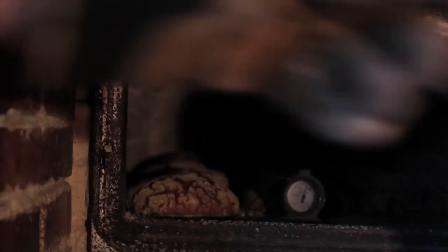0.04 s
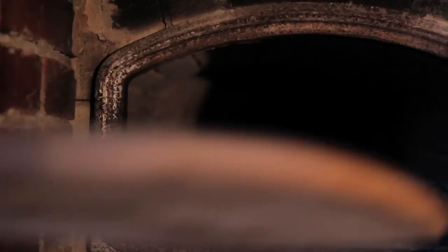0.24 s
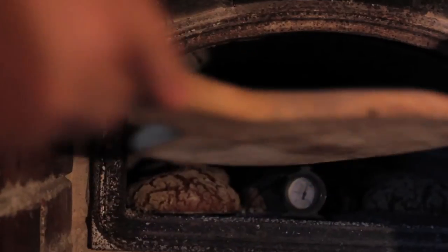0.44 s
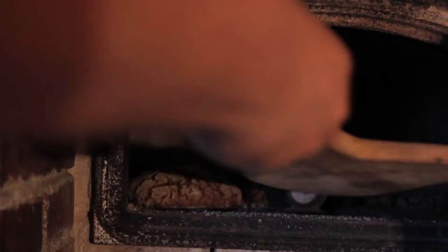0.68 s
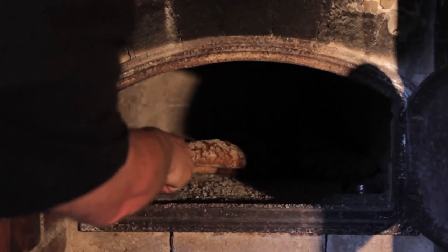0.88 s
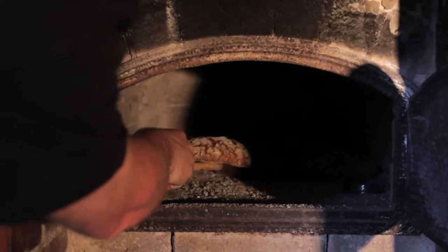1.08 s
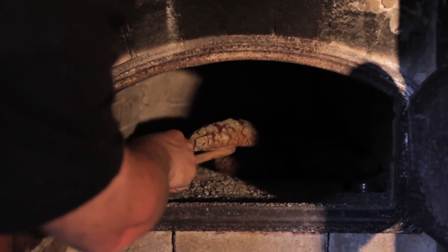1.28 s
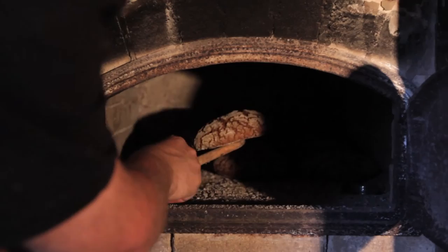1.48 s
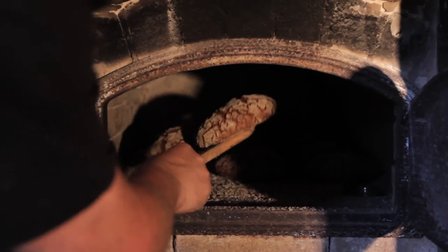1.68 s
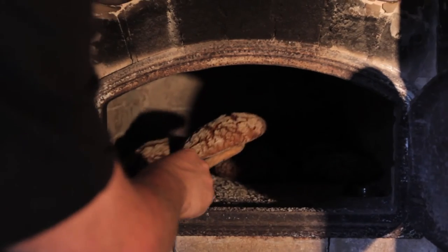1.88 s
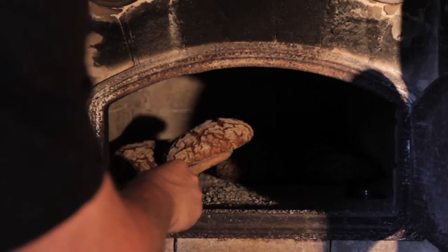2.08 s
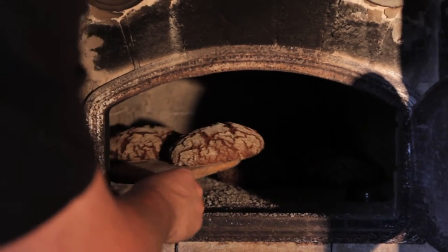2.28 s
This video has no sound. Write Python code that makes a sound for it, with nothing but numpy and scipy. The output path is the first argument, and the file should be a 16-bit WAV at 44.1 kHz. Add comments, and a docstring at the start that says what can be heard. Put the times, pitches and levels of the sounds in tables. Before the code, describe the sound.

One hard knock of a baker's wooden paddle on iron, followed by gritty sliding and clicks.

```python
"""A wooden baker's peel (a long flat shovel) works at a brick oven, close by in a small quiet room.
It starts to move with a low shudder and two thin chinks of iron, then knocks once, hard, at the
oven's iron mouth, which rings on faintly. Next the blade slides in over the gritty hearth, bumping
and clicking. Last, the shaft rubs to and fro, still shuddering."""
import sys
import numpy as np
from scipy import signal
from scipy.fft import rfft, irfft, next_fast_len
from scipy.io import wavfile

SR = 44100
rng = np.random.default_rng(int(sys.argv[2]) if len(sys.argv) > 2 else 0)


def pcm_store(signal):
    """Save signal as 16-bit PCM."""
    levels = np.round(np.clip(np.atleast_2d(signal), -1, 1) * 32767)
    wavfile.write(sys.argv[1], SR, levels.astype(np.int16).T)


N = 108045
T = np.arange(N) / SR


def amp(db):
    """Turn decibels into a gain."""
    return 10 ** (np.asarray(db) / 20)


def unit(x):
    """Scale x to an average power of 1."""
    return x / np.sqrt(np.mean(x ** 2) + 1e-20)


def along(points, hz):
    """Read between (pitch_hz, value) points on a musical pitch scale."""
    pitches, values = np.transpose(points)
    return np.interp(np.log(hz + 1), np.log(pitches + 1), values)


def level(points):
    """A gain for every sample, from (time_s, level_db) points."""
    return amp(np.interp(T, *np.transpose(points)))


def filtered(x, response):
    """Turn each pitch in x up or down by response(hz)."""
    size = next_fast_len(len(x) + 8192)
    hz = np.fft.rfftfreq(size, 1 / SR)
    return irfft(rfft(x, size) * response(hz), size)[:len(x)]


def noise(gain, size=N):
    """Steady noise whose tone is set by gain(hz)."""
    hz = np.fft.rfftfreq(size, 1 / SR)
    phases = np.exp(2j * np.pi * rng.random(len(hz)))
    return unit(irfft(gain(hz) * phases, size))


def colour(points, top_hz=np.inf):
    """A tone curve from (pitch_hz, gain_db) points, dulled above top_hz."""
    return lambda hz: amp(along(points, hz)) / np.sqrt(1 + (hz / top_hz) ** 6)


def body(peaks):
    """The tone curve of an object that favours some pitches: (pitch_hz, width_hz, gain_db)."""
    return lambda f: sum((-1) ** k * amp(db) * 1j * f * width / (hz * hz - f * f + 1j * f * width)
                         for k, (hz, width, db) in enumerate(peaks))


def rise(t, attack_s):
    """A quick swell from silence to full level."""
    return 1 - np.exp(-t / attack_s)


def fade(t, fade_s):
    """A smooth fall that is 60 dB down after fade_s."""
    return np.exp(-np.log(1000) * t / fade_s)


def dying(x, fades):
    """Let each pitch in x die at its own speed, from (pitch_hz, fade_s) points."""
    hz, t, spectrum = signal.stft(x, SR, nperseg=256)
    spectrum = spectrum * fade(t, along(fades, hz)[:, None])
    return signal.istft(spectrum, SR, nperseg=256)[1][:len(x)]


def ring(notes, t, blur=0):
    """The fading notes of a struck object, each smeared by the share blur of its pitch."""
    out = np.zeros(len(t))
    for k, (hz, db, fade_s) in enumerate(notes):
        drift = np.cumsum(rng.standard_normal(len(t))) * np.sqrt(2 * np.pi * blur * hz / SR)
        out += (-1) ** k * amp(db) * fade(t, fade_s) * np.sin(2 * np.pi * hz * t + drift)
    return out


def burst(envelope, gain):
    """A short spray of contact noise, with its tone set by gain(hz)."""
    size = 2 * len(envelope)
    curve = unit(np.abs(gain(np.fft.rfftfreq(size, 1 / SR)))) + 1e-6
    # fold the filter forward in time, so no sound comes before the contact
    folded = irfft(np.log(curve), size)
    folded[1:size // 2] *= 2
    folded[size // 2 + 1:] = 0
    spray = envelope * noise(np.ones_like, size=len(envelope))
    return irfft(rfft(spray, size) * np.exp(rfft(folded)), size)[:len(envelope)]


def grit(per_s, spread_db, share, slip_s=0.0024):
    """Friction: tiny uneven slips carry a share of the power, and smooth hiss the rest."""
    slips = rng.random(N) < per_s / SR
    sizes = slips * amp(spread_db * np.minimum(rng.exponential(size=N), 3))
    power = signal.lfilter([1], [1, -np.exp(-2 / (slip_s * SR))], sizes ** 2)
    return np.sqrt(share * power / power.mean() + 1 - share) * rng.standard_normal(N)


def room_tone():
    """The faint, steady hush of the room."""
    # tone of the hush: pitch_hz, gain_db
    hush_tone = [(18, -47), (30, -7), (656, -12), (852, -3), (1110, -19), (1970, -9), (15500, -16.5)]
    return amp(-69.5) * noise(colour(hush_tone))


def shudder():
    """The moving peel rumbles at its lowest pitches."""
    # loudness of the rumble: time_s, level_db
    rumble_levels = [(0, -57), (.2, -51), (.27, -45), (.44, -64), (.62, -54), (.8, -48), (.93, -51),
                     (1.12, -76), (1.16, -55), (1.26, -54.5), (1.385, -69), (1.48, -63), (1.69, -74),
                     (1.77, -53), (1.97, -76), (2.005, -63.5), (2.2, -62.5), (2.36, -84)]
    # tone of the rumble: pitch_hz, gain_db
    rumble_tone = [(25, -31.5), (50, -19.5), (68, -2), (85, 0.5), (105, -5.5), (140, -14.5), (190, -13.5),
                   (300, -48.5)]
    return level(rumble_levels) * noise(colour(rumble_tone))


def drone():
    """The moving blade shakes with a hollow drone."""
    # loudness of the drone: time_s, level_db
    drone_levels = [(0, -47), (.42, -60.5), (.48, -59), (.56, -52.5), (.72, -46.5), (.88, -58), (1.1, -74),
                    (1.15, -57.5), (1.3, -56), (1.39, -71.5), (1.44, -55.5), (1.53, -75), (1.65, -69.5),
                    (1.68, -56.5), (1.79, -51.5), (1.96, -76.5), (2.01, -51.5), (2.35, -78)]
    # pitches the blade favours: pitch_hz, width_hz, gain_db
    blade_peaks = [(156, 23, -7), (180, 30, -7.5), (235, 37, -2), (283, 14, 3.5), (394, 57, -10.5)]
    return level(drone_levels) * noise(lambda hz: body(blade_peaks)(hz) / (1 + (hz / 600) ** 2))


def flex(pitch_hz=85.6, fade_s=0.8):
    """The long shaft bends back and forth after a jolt, and hums."""
    # jolts to the shaft: start_s, level_db
    jolts = [(0, -43.5), (1.145, -45.5)]
    out = np.zeros(N)
    for start_s, db in jolts:
        add(out, start_s, ring([(pitch_hz, db, fade_s)], T) * rise(T, attack_s=0.0043))
    return out


def slide(flour_hz=10500, flour_width_hz=7000):
    """The blade grinds over coarse grit, and fine flour crackles high above it."""
    # loudness of the sliding: time_s, level_db
    slide_levels = [(0, -59), (.2, -60), (.34, -63.5), (.43, -52.5), (.48, -56.5), (.54, -49.5), (.63, -50),
                    (.69, -41), (.75, -51), (.83, -48), (.89, -46.5), (.94, -58), (1.07, -57.5),
                    (1.11, -68.5), (1.155, -50), (1.18, -59.5), (1.245, -54.5), (1.28, -64.5), (1.39, -70),
                    (1.65, -76)]
    # tone of the coarse grit: pitch_hz, gain_db
    grit_tone = [(180, -30.5), (300, -11), (476, -7.5), (781, -2), (968, -6), (1070, -4.5), (2040, -7),
                 (3570, -10), (7370, -20), (15500, -39.5)]
    flour_tone = body([(flour_hz, flour_width_hz, 0)])
    coarse = filtered(grit(per_s=900, spread_db=3.5, share=0.7), colour(grit_tone))
    fine = filtered(grit(per_s=220, spread_db=3.0, share=0.87), lambda hz: flour_tone(hz) ** 2)
    return level(slide_levels) * (unit(coarse) + amp(-17) * unit(fine))


def chinks():
    """Light touches on iron give thin, high chinks before the knock."""
    # touches on iron: start_s, level_db, pitch_hz, width_hz, fade_s
    touches = [(.009, -43.5, 4820, 1087, 0.057), (0.113, -57, 5200, 902, 0.12)]
    out, t = np.zeros(N), T[:SR // 6]
    for start_s, db, pitch_hz, width_hz, fade_s in touches:
        envelope = rise(t, attack_s=0.0024) * fade(t, fade_s)
        peak = body([(pitch_hz, width_hz, 0)])
        add(out, start_s, amp(db) * burst(envelope, lambda hz: peak(hz) ** 2))
    return out


def room(x):
    """The oven and the room answer with a short wash of echoes."""
    # how long the echoes last: pitch_hz, fade_s
    echo_fades = [(200, 0.092), (1500, .19), (5000, 0.085), (12000, 0.069)]
    tail = dying(rng.standard_normal(SR // 2), echo_fades) * rise(T[:SR // 2], attack_s=0.0013)
    return signal.fftconvolve(x, tail / np.linalg.norm(tail))[:N]


def knock(start_s=0.2272, iron_lag_s=0.00123):
    """Wood hits iron once: a crack and a thud, and both are set ringing."""
    # notes of the peel and the oven mouth: pitch_hz, gain_db, fade_s
    peel_notes = [(226.8, -17, .19), (483.7, -12.5, .14), (728, -2, .06), (875, -7.5, 0.18),
                  (1083, -9.5, 0.12), (1327, -18.5, 0.19), (1750, -10.5, .075), (1893, -23, 0.089),
                  (2309, -27, 0.24), (2552, -11.5, .075), (2618, -9, 0.063), (3025, -27, 0.11),
                  (3440, -17.5, .07)]
    # bright, short notes of the iron: pitch_hz, gain_db, fade_s
    iron_notes = [(4899, -9, 0.06), (5222, 0.5, 0.047), (5400, -5, .04), (6686, -18, 0.09)]
    # lingering notes of the iron: pitch_hz, level_db, fade_s
    hum_notes = [(549, -35.5, .66), (878, -41, .85)]
    # tone of the thud and the crack: pitch_hz, gain_db
    blow_tone = [(50, -36.5), (125, -11.5), (200, 1.5), (310, -4), (560, -3), (780, 0.5), (1150, 0.5),
                 (1500, -5.5), (1850, -8), (2100, -12.5), (3000, -15.5), (4400, -17), (5350, -19.5),
                 (6000, -21.5), (7500, -34.5), (15000, -46.5)]
    # how long the thud lasts: pitch_hz, fade_s
    thud_fades = [(150, 0.174), (800, 0.13), (2000, 0.13), (5000, 0.16), (12000, 0.115)]
    out, t = np.zeros(N), T[:SR]
    onset = rise(t, attack_s=0.0015)
    thud = amp(-17) * dying(burst(np.ones_like(t), colour(blow_tone)), thud_fades)
    crack = amp(-19) * burst(fade(t, fade_s=0.044), colour(blow_tone))
    ringing = amp(-9.5) * ring(peel_notes, t, blur=0.0011) + ring(hum_notes, t)
    add(out, start_s, thud + crack + ringing * onset)
    add(out, start_s + iron_lag_s, amp(-16.5) * ring(iron_notes, t) * onset)
    return out


def bumps():
    """The peel bumps softly, each time with a dull tap and one short note."""
    # soft bumps: start_s, level_db, note_hz, note_gain_db, top_hz, fade_s
    contacts = [(.374, -31.5, 1213, -5.5, 2310, 0.061), (.501, -38, 1027, 4.5, 2500, 0.036),
                (.956, -56.5, 918, 7, 2020, 0.12), (0.982, -40, 633, 3, 3500, 0.057),
                (1.286, -41, 885, -2.5, 3500, 0.029), (1.31, -39.5, 1360, -9.5, 4400, 0.037),
                (1.349, -41.5, 1410, -21, 4570, 0.029), (1.431, -37.5, 684, 1.5, 3100, 0.053),
                (1.489, -50, 680, 1.5, 3450, 0.063), (1.671, -42.5, 1810, -10.5, 2140, 0.057),
                (1.770, -51, 638, 11, 2480, 0.08)]
    # tone of the tap: pitch_hz, gain_db
    tap_tone = [(80, -27.5), (290, 8), (480, -10), (750, 4), (950, -4), (1200, 4.5), (1850, -4), (3000, -7),
                (8000, -3)]
    out, t = np.zeros(N), T[:SR // 6]
    onset = rise(t, attack_s=0.0024)
    for start_s, db, note_hz, note_db, top_hz, fade_s in contacts:
        note = np.sqrt(2) * onset * ring([(note_hz, note_db, fade_s)], t, blur=0.0054)
        tap = burst(onset * fade(t, fade_s), colour(tap_tone, top_hz))
        add(out, start_s, amp(db) * (tap + note))
    return out


def clicks(tail_top_hz=6350):
    """Grit clicks under the blade: a sharp snap with a softer tail."""
    # clicks of grit: start_s, level_db, top_hz, tail_fade_s
    grains = [(0.5023, -30.5, 5100, 0.025), (.519, -34, 4950, 0.04), (.547, -38, 11900, 0.034),
              (.6805, -32, 8700, 0.032), (.702, -33, 15000, 0.015), (.8045, -37, 6440, 0.053),
              (0.841, -34.5, 11100, 0.018), (0.9805, -23.5, 9900, 0.037), (1.1245, -34, 4900, 0.039),
              (1.235, -39.5, 13200, 0.077), (1.258, -45, 9000, 0.038), (1.2915, -37.5, 12100, 0.039),
              (1.491, -44, 6850, 0.036), (1.67, -47.5, 7000, 0.051), (1.715, -43, 7000, 0.071),
              (2.101, -45.5, 9030, 0.05)]
    # tone of a click: pitch_hz, gain_db
    click_tone = [(100, -11.5), (430, -34.5), (600, 0), (900, -0.5), (1400, 4), (1900, -3), (2500, 1),
                  (5000, -7), (9000, -5.5), (15000, -17)]
    out, t = np.zeros(N), T[:SR // 6]
    for start_s, db, top_hz, tail_fade_s in grains:
        snap = burst(fade(t, fade_s=0.0075), colour(click_tone, top_hz))
        tail = burst(fade(t, tail_fade_s), colour(click_tone, min(top_hz, tail_top_hz)))
        add(out, start_s, amp(db) * (snap + amp(-4.5) * tail))
    return out


def rub():
    """The shaft rubs in two gritty strokes, and the friction makes it sound hollow notes."""
    # loudness of the two strokes, then of a faint background hiss swelling at the end: time_s, level_db
    levels = [(1.66, -75), (1.705, -64.5), (1.716, -49.5), (1.755, -51), (1.777, -40.5), (1.795, -55),
              (1.82, -52.5), (1.87, -59), (1.94, -74), (1.986, -99), (1.994, -55.5), (2.06, -56.5),
              (2.11, -53.5), (2.18, -62.5), (2.3, -78), (2.45, -70)]
    # tone of the rasp: pitch_hz, gain_db
    rasp_tone = [(190, -41.5), (330, -5), (420, 0), (502, -29), (629, -1), (867, -12), (1180, -6),
                 (3250, -20.5), (3900, -13), (9500, -25.5), (15500, -43.5)]
    # pitches the shaft favours: pitch_hz, width_hz, gain_db
    shaft_peaks = [(640, 66, -2), (1130, 160, -5), (1800, 110, -4.5), (2310, 96, -6), (2878, 90, -4),
                   (3537, 80, -1.5)]
    slips = grit(per_s=750, spread_db=3.8, share=0.7)
    rasp = unit(filtered(slips, colour(rasp_tone)))
    hollow = unit(filtered(slips * rng.choice([-1, 1], N), body(shaft_peaks)))
    return level(levels) * unit(rasp + amp(-2.5) * hollow)


def add(out, start_s, x):
    """Mix x into out, beginning at start_s."""
    i = max(0, round(start_s * SR))
    out[i:i + len(x)] += x[:N - i]


def scene():
    """Mix all the sounds; only the knock and the small taps echo."""
    blow = knock()
    taps = clicks() + bumps() + chinks()
    echo = room(amp(-11.5) * blow + amp(-10) * taps)
    add(echo, 0.04, amp(-26.5) * blow)  # the knock comes back once from a wall
    movement = slide() + rub() + shudder() + drone() + flex()
    return (blow + taps + echo + movement + room_tone())[None]


def record(dry, soften_hz=14000, top_hz=15900):
    """The microphone softens the highest treble, and everything above top_hz is cut."""
    return filtered(dry[0], lambda hz: (hz < top_hz) / np.sqrt(1 + (hz / soften_hz) ** 10))[None]


dry = scene()
out = record(dry)
pcm_store(out)
```